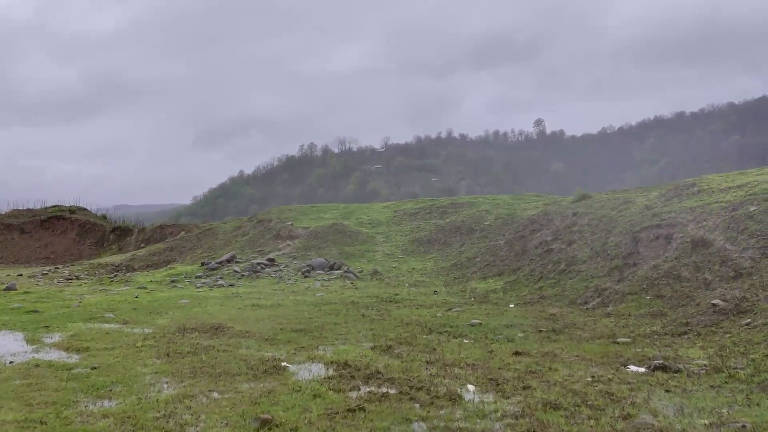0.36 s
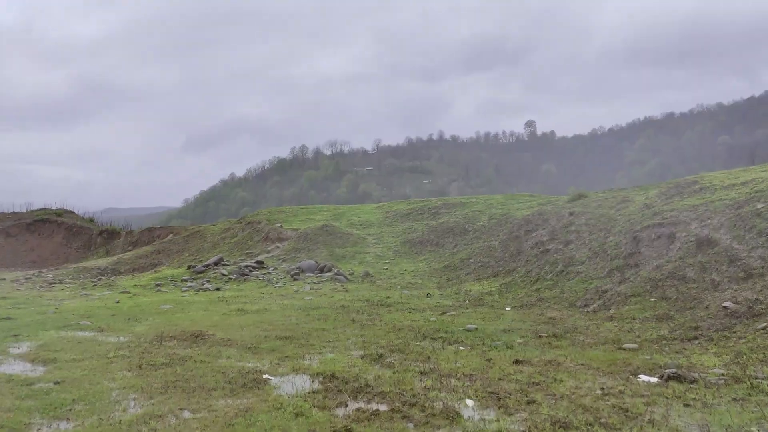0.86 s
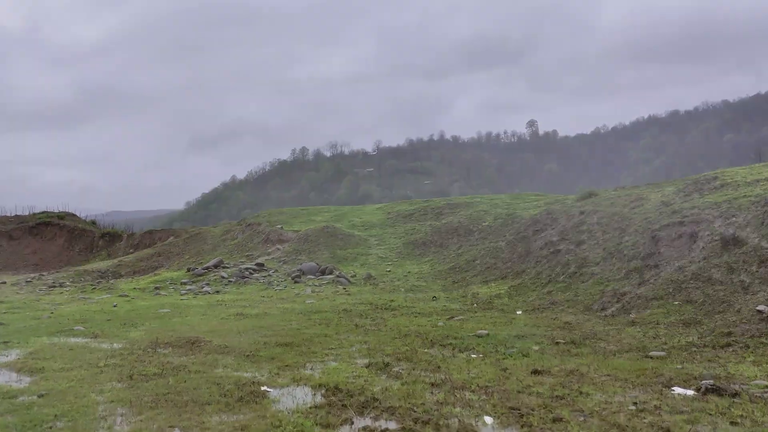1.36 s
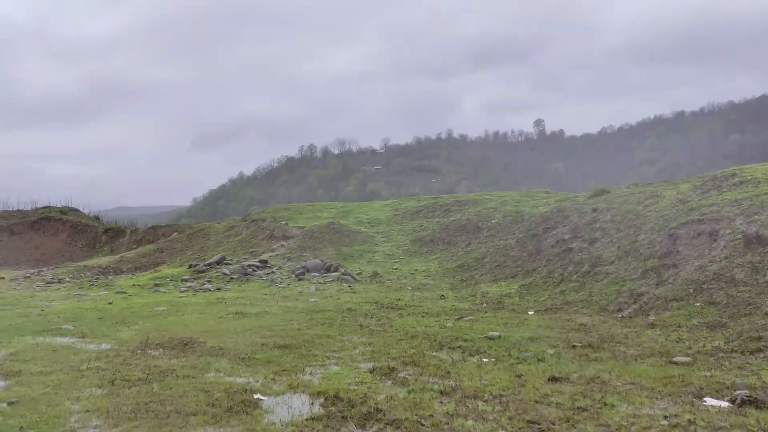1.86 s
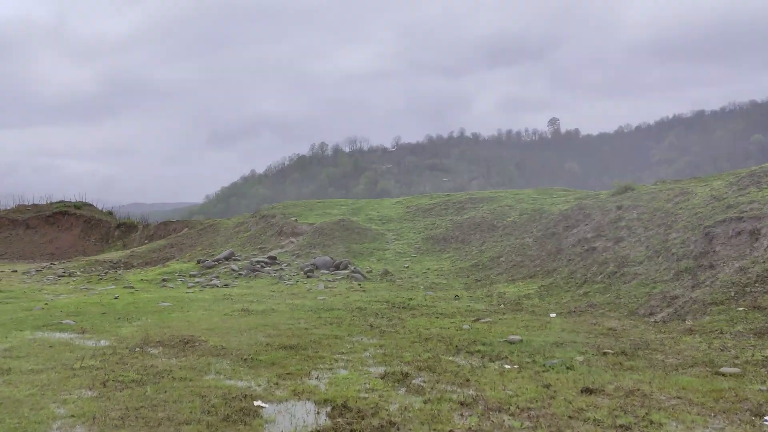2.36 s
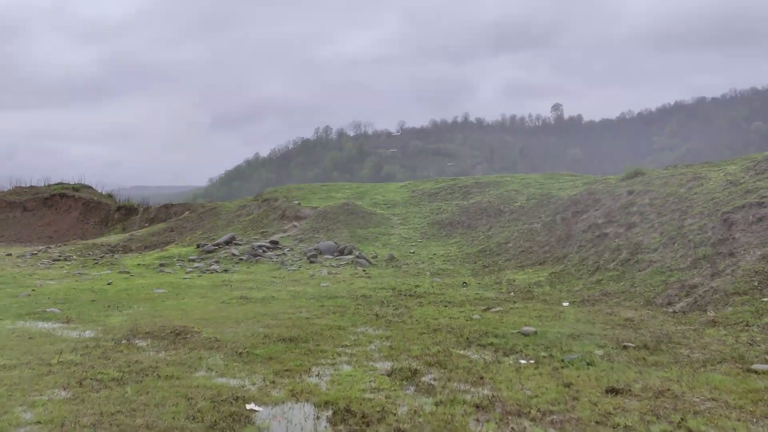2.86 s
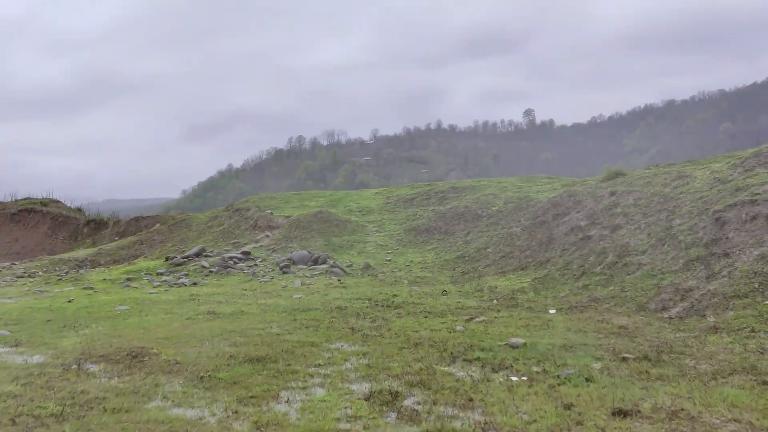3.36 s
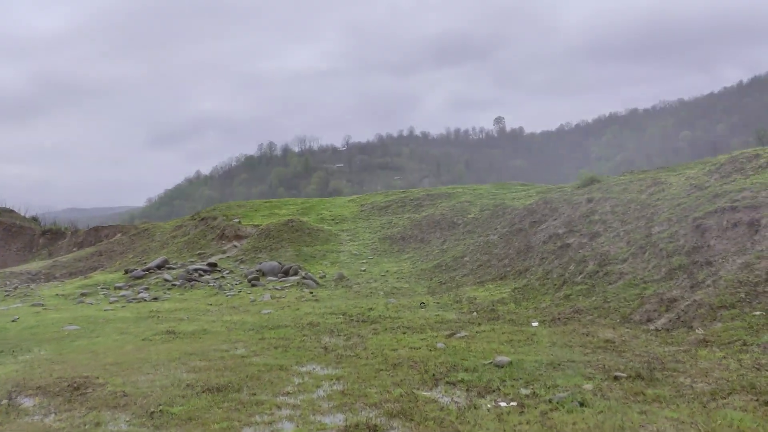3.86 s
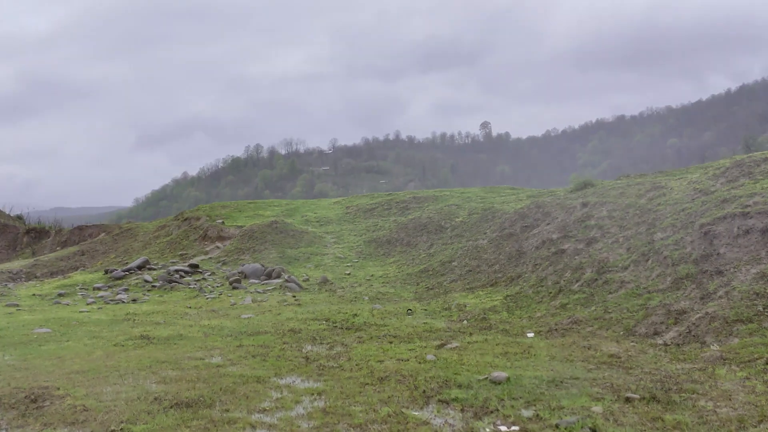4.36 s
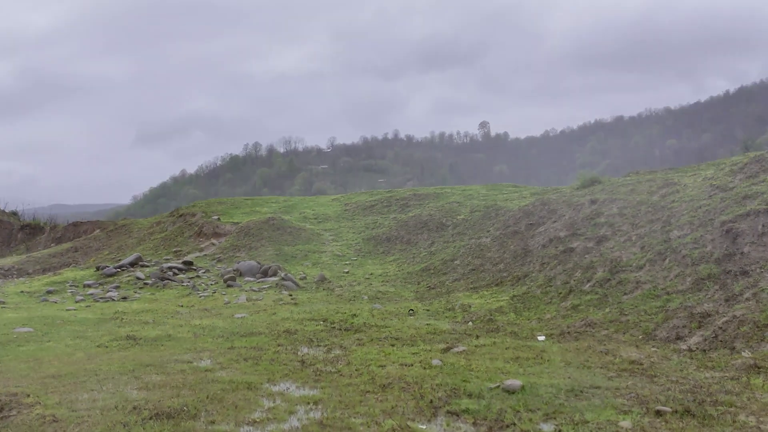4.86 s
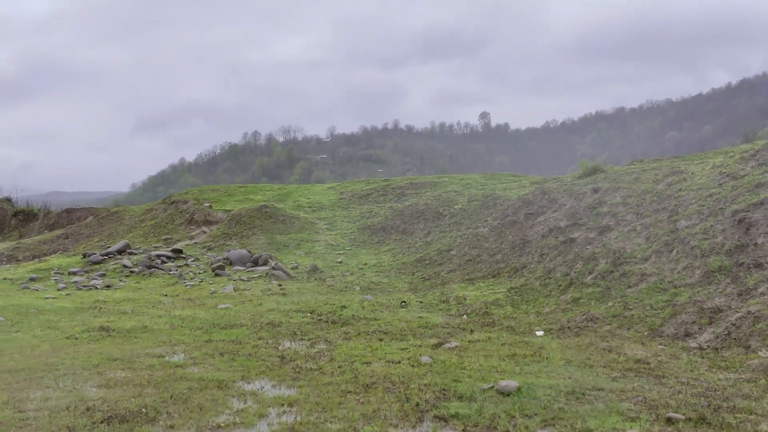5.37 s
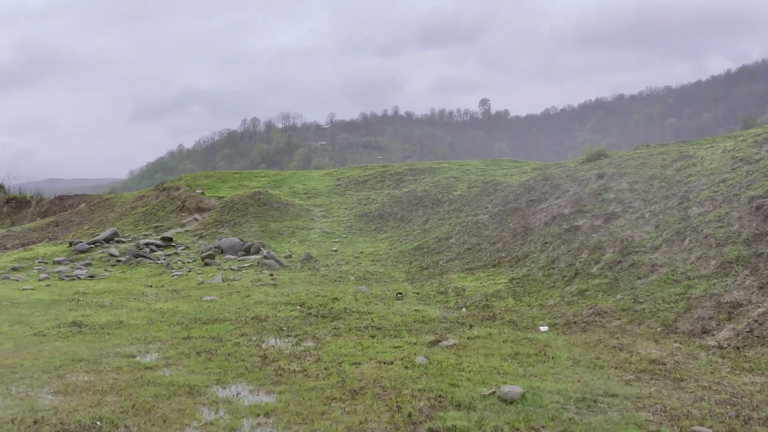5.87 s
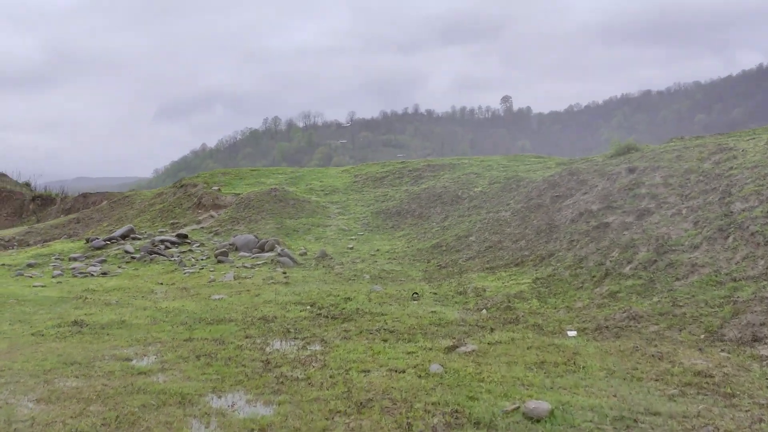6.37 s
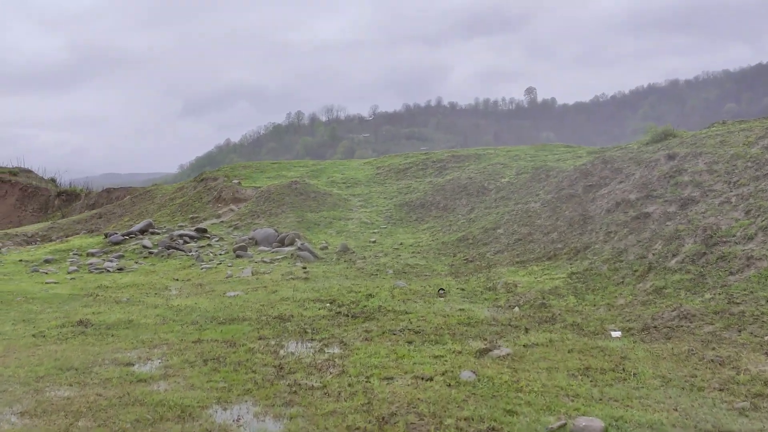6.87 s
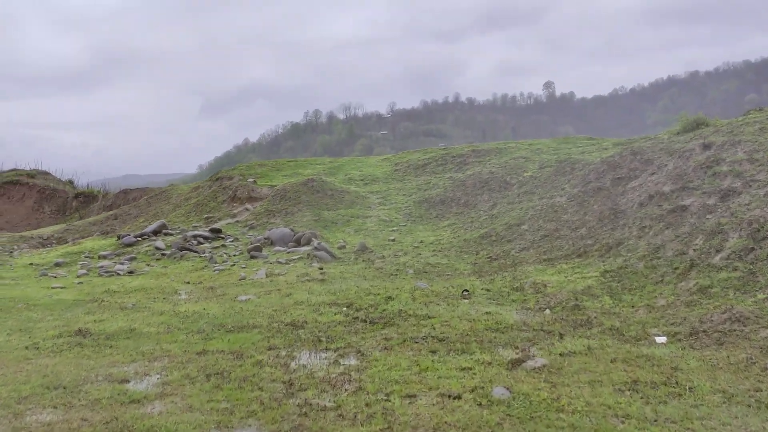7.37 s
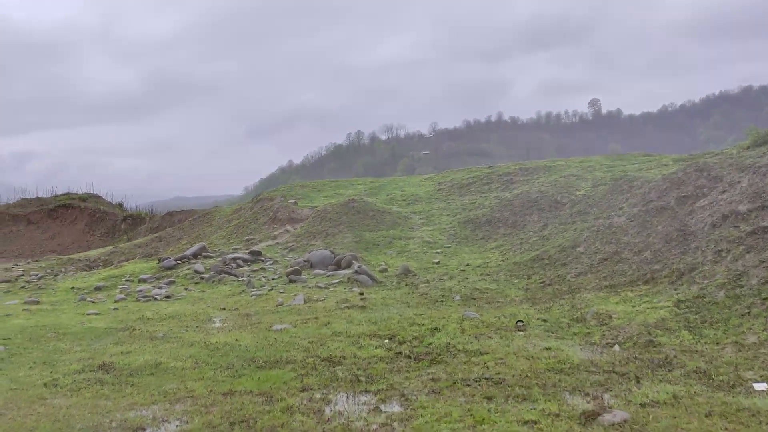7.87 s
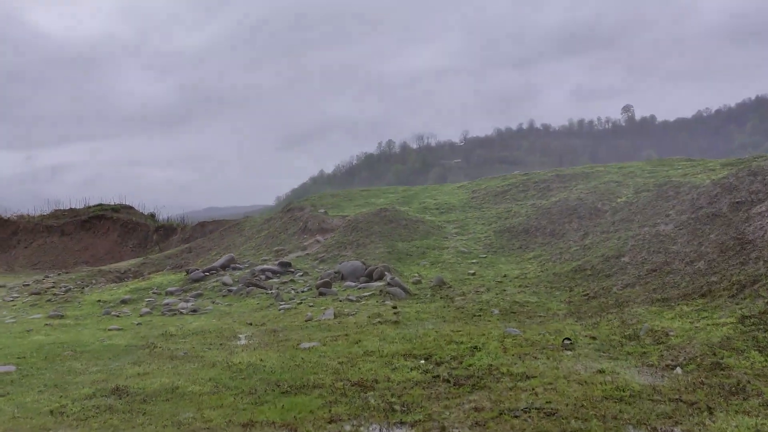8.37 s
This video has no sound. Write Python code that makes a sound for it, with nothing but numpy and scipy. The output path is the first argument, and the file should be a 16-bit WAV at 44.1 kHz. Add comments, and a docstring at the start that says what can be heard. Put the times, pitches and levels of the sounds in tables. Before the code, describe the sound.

In an open, wet field, a walker's steps crush grass with wet crackle and brittle snaps, the strongest near the start and the end. Low distant wind rumbles throughout, and gusts bump the left side of a handheld stereo microphone. A few faint bird whistles come early, two tiny squeaks underfoot midway. Dry, close and echo-free, with no speech.

```python
"""Wind is heard first: a nearly steady far roar reaching the right port before the left, and lumpy buffets mostly left.
Over it someone walks on wet grass: legs swish, blades crush and snap, mud pops, two short squeaks sound
and a small bird chirps a few times. The wind, crush and swish are shaped noise, with damped sines for the grains
of the crush; snaps are noise bursts through resonances, pops, squeaks and thumps decaying sines, chirps arched sines.
Two microphone ports hear it all; the left one is turned away and hears little treble."""
import sys
import numpy as np
from scipy import signal
from scipy.fft import rfft, irfft, next_fast_len
from scipy.io import wavfile
from scipy.ndimage import map_coordinates

SR = 44100
rng = np.random.default_rng(int(sys.argv[2]) if len(sys.argv) > 2 else 0)


def amplitude_ratio(level_db):
    """Convert a level in decibels to the matching linear amplitude (field) ratio."""
    exponent = np.asarray(level_db, float) / 20
    return 10 ** exponent


def digitize_waveform(pressure):
    """Quantize a signal to 16-bit integers and store it at the path in sys.argv[1].

    Rows of a 2-D input are taken as channels; values are limited to [-1, 1].
    """
    field = np.atleast_2d(pressure).T
    bounded = np.clip(field, -1, 1)
    quanta = np.round(bounded * 32767).astype(np.int16)
    wavfile.write(sys.argv[1], SR, quanta)


N = 373968  # samples

# spectrum shared by crushed and snapping blades: f/Hz, relative density level/dB
CRUSH_SPECTRUM = [(1200, -48), (2000, -9), (2900, -3.5), (4200, 0), (5500, 0.5), (8000, 5.5), (10000, -3.5),
                  (12000, -7), (15500, -6)]
# left-right likeness of sounds at the feet: f/Hz, share in common (0-1)
NEAR_LIKENESS = [(800, 0.96), (2000, 0.26), (4000, 0.1), (9000, 0.1)]
FAR_LAG, NEAR_LAG = 24 / SR, 7.5 / SR  # s by which the left port hears later


def unit(x):
    """Normalization: scale to rms 1."""
    return x / np.sqrt(np.mean(x ** 2) + 1e-20)


def along(points, hz):
    """Logarithmic frequency scale: (f/Hz, value) points are joined on a log axis."""
    f, value = np.transpose(points)
    return np.interp(np.log(hz + 1), np.log(f + 1), value)


def wobble(rate):
    """Band-limited fluctuation: a spline through random knots, rate (at most SR / 9) of them a second."""
    knots = rng.standard_normal(N // 8)
    return map_coordinates(knots, [np.arange(N) * min(rate, SR / 9) / SR], order=3)


def filtered(x, response):
    """Linear filtering: the spectrum is multiplied by a complex response of frequency."""
    m = next_fast_len(N + 8192)
    return irfft(rfft(x, m) * response(np.fft.rfftfreq(m, 1 / SR)), m)[..., :N]


def coloured(x, spectrum):
    """Spectral shaping: x passes a spectrum that is closed at both ends."""
    closed = [(spectrum[0][0] / 2, -120), *spectrum, (spectrum[-1][0] * 2, -120)]
    return filtered(x, lambda hz: amplitude_ratio(along(closed, hz)))


def ports(pair, alike, lag):
    """Partial coherence: left is a late blend of two signals, right the first alone."""
    def blend(hz):
        share = np.clip(along(alike, hz), 0, 1)
        delay = np.exp(-2j * np.pi * hz * lag)
        return np.array([share, np.sqrt(1 - share ** 2)]) * delay
    return np.array([filtered(pair, blend).sum(axis=0), pair[0]])


def sides(left_db):
    """Level difference between ports: gains that split a left-over-right value evenly."""
    return amplitude_ratio(np.array([left_db / 2, -left_db / 2]))


def strokes(start, hold, db, rise, fall, rest_db):
    """Energy addition: strokes with linear slopes in dB/s sum in power over a resting level, giving dB."""
    t = np.arange(0, N / SR + .01, .001)
    early = np.maximum(start[:, None] - t, 0)
    late = np.maximum(t - (start + hold)[:, None], 0)
    each = db[:, None] - rise * early - fall * late
    power = (amplitude_ratio(each) ** 2).sum(axis=0) + amplitude_ratio(rest_db) ** 2
    return np.interp(np.arange(N) / SR, t, 10 * np.log10(power))


def grains(count, mid_hz, spread, cycles, size_db):
    """Granular noise: two showers of damped sines share their times, each grain with its own pitch and size."""
    when, pitch, size, sign = rng.random((4, 2, count))
    hz = np.clip(mid_hz * np.exp(spread * 3.72 * (pitch - .5)), 400, SR / 3)[..., None]
    n = np.arange(128)
    shape = np.sin(2 * np.pi * hz * n / SR) * np.exp(-n * hz / SR / cycles)
    strength = np.sign(sign - .5) * amplitude_ratio(-size_db * np.log(size + 0.0068))
    shape *= strength[..., None] * np.sqrt(hz)  # short high grains keep their energy
    at = (when[0] * N).astype(int)[:, None] + n
    return np.array([np.bincount(at.ravel(), g.ravel(), N + 128)[:N] for g in shape])


def roar():
    """Distant turbulence: far wind over the slopes is a nearly steady noise, partly coherent at the ports."""
    # roar spectrum: f/Hz, relative density level/dB
    far_spectrum = [(40, -39), (69, -17.5), (185, -7.5), (330, -7), (400, -8.5), (615, -18.5), (800, -22),
                    (1200, -27), (1700, -29), (2000, -35.5), (2700, -36.5), (4200, -38.5), (8500, -47),
                    (11000, -63), (15800, -62)]
    # left-right likeness: f/Hz, share in common (0-1)
    far_likeness = [(100, 0.92), (300, 1), (500, 0.13), (1000, 0.54), (2000, 0.62), (4000, 0.07),
                    (10000, .05)]
    noise = unit(coloured(rng.standard_normal((2, N)), far_spectrum))
    return amplitude_ratio(-41 + 1.2 * wobble(11)) * ports(noise, far_likeness, FAR_LAG)


def buffet():
    """Local turbulence: eddies shake each port on their own, so the lumpy low noises are incoherent."""
    # gusts: t/s, level before surges and port difference/dB
    gusts = [(0.0, -39), (0.15, -40.5), (0.3, -42), (0.6, -39), (0.95, -41), (1.05, -54), (1.4, -43),
             (1.7, -48), (2.1, -41.5), (2.45, -41), (2.7, -42.5), (3.1, -42.5), (3.5, -40), (3.75, -41.5),
             (4.0, -41), (4.3, -41), (4.75, -48), (5.4, -52), (6.0, -54), (6.45, -49), (7.1, -60),
             (7.4, -46), (7.65, -41.5), (7.95, -48.5), (8.15, -42), (8.48, -51.5)]
    # buffet spectrum: f/Hz, relative density level/dB
    buffet_spectrum = [(20, -72), (40, -24), (70, -8), (120, -1), (200, -4), (300, -11), (450, -22),
                       (800, -30), (1500, -98)]
    gust_s, gust_db = np.transpose(gusts)
    level_db = np.interp(np.arange(N) / SR, gust_s, gust_db)
    slow = np.array([wobble(25), wobble(29)])
    fast = np.array([wobble(90), wobble(90)])
    lumps = amplitude_ratio(2.24 * slow + 2.24 * fast)
    surges = amplitude_ratio(level_db + wobble(4.28))  # quick random surges of 1 dB
    noise = unit(coloured(lumps * rng.standard_normal((2, N)), buffet_spectrum))
    return surges * sides(14.5)[:, None] * noise


def swish():
    """Friction noise: legs brush as they swing, smooth and bright, stronger at the right port."""
    # swings: start t/s, hold/s, level before port difference/dB
    swings = [(0.618, 0.019, -51.5), (1.35, 0.4, -70), (1.796, 0.24, -59.5), (2.787, 0.21, -63.5),
              (3.12, 0.18, -65.5), (3.864, 0.085, -66.5), (4.3, 0.4, -72.5), (5.09, 0.05, -59),
              (5.45, 0.4, -69.5), (5.66, .06, -66), (6.13, 0.15, -66.5), (6.758, 0.11, -65.5),
              (7.25, 0.13, -60), (7.5, 0.086, -65.5), (7.76, .08, -65), (7.934, 0.081, -62),
              (8.41, .08, -64)]
    # brushing spectrum: f/Hz, relative density level/dB
    brush_spectrum = [(2500, -2), (4500, -0.5), (6500, 2), (8000, 6), (10000, -2.5), (12000, -1),
                      (15500, 0)]
    rise, fall = 100, 110  # dB/s
    cloth_db = -73.5  # faint steady brushing
    level_db = strokes(*np.transpose(swings), rise, fall, cloth_db)
    noise = unit(coloured(rng.standard_normal((2, N)), brush_spectrum))
    return amplitude_ratio(level_db + 1.5 * wobble(25)) * sides(-11.5)[:, None] * noise


def tread():
    """Superposed impacts: the sole crushes blades into crackle over a hiss and presses out lower wet grains."""
    # sole presses: start t/s, hold/s, nominal crush level/dB, squelch over crush/dB, dry top over crush/dB
    presses = [(0.246, 0.027, -49.5, -5, -1), (0.306, 0.013, -41, -7.5, 1), (0.314, 0.025, -56, -14, -5),
               (0.707, 0.011, -54.5, -2, 1), (0.753, 0.014, -50, -4, -9), (0.82, 0.057, -54.5, 3, -1.5),
               (1.294, 0.16, -60.5, 0.5, 1), (1.954, 0.032, -49, -0.5, 3), (2.417, 0.027, -59.5, -16, 11),
               (2.48, 0.055, -47.5, -2, -4), (2.921, 0.015, -46, -10, 5), (3.013, 0.011, -53, -10, 1),
               (3.048, 0.038, -48, -2.5, -3), (3.433, 0.022, -62.5, -11, 10), (3.457, 0.023, -51, -12, 0.5),
               (3.536, 0.097, -53.5, -3.5, -11), (4.096, 0.037, -46.5, -10, 2),
               (4.174, 0.06, -57.5, 0, 0.5), (4.623, 0.065, -49, -14, -7), (4.7, 0.026, -48.5, -7.5, 0),
               (5.205, 0.038, -49, -4, 2), (5.254, 0.023, -47, -10, -3), (5.32, 0.051, -62, -16, -17),
               (5.723, 0.008, -53, -14, -3), (5.741, 0.016, -41.5, -10, 1.5), (6.154, 0.033, -55, 4.5, 2),
               (6.203, 0.11, -56, -6, -10), (6.322, 0.08, -49, 1, 1.5), (6.806, 0.028, -60.5, -23, 7.5),
               (6.863, 0.058, -42.5, -7, -3), (6.945, 0.023, -50, -9, -4), (7.023, .035, -59, -16, -6),
               (7.385, 0.0065, -46.5, -1.5, 5), (7.455, 0.15, -56.5, -1.5, -5), (8.044, 0.05, -53, -19, -7),
               (8.136, 0.023, -69.5, 19.5, -19)]
    # squelch spectrum: f/Hz, relative density level/dB
    squelch_spectrum = [(400, -25), (800, -2), (1300, 0.5), (1700, 4), (2600, -3), (4000, 5.5)]
    slopes = 1800, 450, -67  # rise dB/s, fall dB/s, nominal resting dB: the grass never quite rests
    dry_hz = 5800  # dry blade tips sound above this, wet stems below
    start, hold, db, wet_db, top_db = np.transpose(presses)
    crush_db = strokes(start, hold, db, *slopes)
    squelch_db = strokes(start, hold, db + wet_db, *slopes)
    tips_db = strokes(start, hold, db + top_db, *slopes)

    # harder presses crackle more and clump more
    effort = np.clip((crush_db + 71.0) / 9, 0, 1)
    crackle = unit(grains(count=15000, mid_hz=5000, spread=0.5, cycles=4, size_db=3.6))
    hiss = rng.standard_normal((2, N))
    clumps = amplitude_ratio(effort * 2.2 * wobble(220) + effort * 1.5 * wobble(45))
    crush = unit(coloured(clumps * (0.58 * effort * crackle + 0.73 * hiss), CRUSH_SPECTRUM))

    drops = unit(grains(count=7000, mid_hz=1400, spread=0.37, cycles=4.5, size_db=1.8))
    squelch = unit(coloured(drops + 0.77 * hiss[::-1], squelch_spectrum))

    stems = filtered(crush, lambda hz: 1 / (1 + (hz / dry_hz) ** 6))
    tips = crush - stems
    near = amplitude_ratio(crush_db + 2.5) * stems + amplitude_ratio(tips_db + 0.5) * tips + amplitude_ratio(squelch_db + 2.5) * squelch
    return sides(0.93)[:, None] * ports(near, NEAR_LIKENESS, NEAR_LAG)


def snaps():
    """Resonant fracture: a fast-dying burst of grit, sharper when harder, excites the pitch of its blade."""
    # snapping blades: t/s, nominal level/dB, left over right before port blending/dB, resonance f/Hz,
    # relative top fizz/dB
    snap_events = [(0.225, -28.5, 2, 8070, -10), (0.234, -40, -5, 9000, -10), (0.255, -23, 4, 7660, -5),
                   (0.305, -15, 3, 5400, -17), (0.312, -23.5, -1, 8550, -5), (0.339, -22, 0, 4470, -21),
                   (0.404, -33, 1, 8900, -14), (0.723, -27, -4, 7500, -9), (0.729, -20, 9, 4280, -32),
                   (0.753, -21, 9, 2900, -30), (0.758, -24, 5, 4630, -30), (0.763, -25.5, 3, 8000, -20),
                   (0.859, -31, 0, 4270, -12), (0.882, -34, 0, 3500, -25), (1.3009, -37, 1, 3950, -4),
                   (1.714, -31.5, -13, 2550, -38), (1.966, -21, -8, 5200, -17),
                   (2.373, -35.5, -9, 3740, -6), (2.4233, -30, -1, 6560, -3), (2.466, -24, 1, 4970, -27),
                   (2.483, -22, -5, 4530, -14), (2.537, -25, -9, 6000, -22), (2.9286, -27, -3, 7800, -6),
                   (2.9377, -25, -1, 8140, -11), (2.9817, -25.5, 0, 2700, -18), (3.026, -22, -9, 8650, -18),
                   (3.052, -21, 4, 6210, -6), (3.068, -34, -5, 6500, -20), (3.081, -21.5, -3, 8500, -19),
                   (3.467, -28.5, -5, 4500, -9), (3.543, -34, -8.5, 8200, -8),
                   (3.559, -30.5, -6, 6700, -20), (3.6187, -34, 8, 3500, -33), (3.63, -33, -1, 7600, -16),
                   (4.038, -30.5, -5, 8050, -14), (4.0836, -32, -8.5, 6700, -2),
                   (4.1215, -27, -2, 7950, -10), (4.19, -31.5, -16, 6100, -36),
                   (4.5915, -29, -8, 3440, -13), (4.6309, -22.5, 7, 3330, -32), (4.644, -26, -5, 4070, -17),
                   (4.652, -25, -5, 4100, -32), (4.659, -27.5, -4, 8600, -7), (4.669, -27, -5, 3900, -34),
                   (4.714, -31, -5, 4500, -30), (4.7247, -27, -9, 8600, -16), (4.9521, -38, -18, 5420, -20),
                   (5.146, -26, -1, 3870, -14), (5.2026, -31.5, -6.5, 8360, -19),
                   (5.218, -30, -4, 3500, -10), (5.224, -31, -6, 6300, -25), (5.257, -31, -3, 3200, -30),
                   (5.265, -31, -5, 6600, -25), (5.288, -27, 3, 6850, -19), (5.5727, -26.5, -2, 2770, -38),
                   (5.7267, -20.5, -3, 4400, -29), (5.7383, -17, 5, 6430, -29), (5.752, -23, -2, 8000, -25),
                   (5.759, -27, -4, 8000, -25), (6.158, -26.5, 6, 5220, -10), (6.175, -23.5, 0, 4160, -25),
                   (6.2896, -26.5, 0, 6270, -10), (6.319, -32, -3, 4290, 3), (6.3844, -35, -4.0, 2500, -27),
                   (6.413, -31.5, -13, 7850, -26), (6.422, -32, -10, 7800, -26),
                   (6.8049, -30.5, 1, 8320, -5), (6.864, -25.5, 1, 3500, -4), (6.901, -20, -8, 3100, -24),
                   (6.927, -36, 0, 5000, -15), (6.951, -34, -5, 5500, -15), (7.0239, -30, 3, 7840, -23),
                   (7.0509, -27.5, 15, 8230, -25), (7.367, -40, -3, 8200, -25), (7.383, -25, 5, 8600, -7),
                   (7.393, -20.5, 6, 7500, -25), (7.395, -17, 12, 2780, -28), (7.4593, -23.5, 8, 2570, -18),
                   (7.6036, -30.5, 0, 4900, -9), (8.0492, -25.5, 1, 6980, -7),
                   (8.061, -18.5, -3, 3830, -24), (8.1396, -13, -5, 4580, -16.5),
                   (8.189, -26.5, -3, 4450, -34)]
    rise_s, soft_db = .0015, -28  # rise of a snap of this nominal level; louder ones rise faster
    out = np.zeros((2, 2, N + SR))  # port, kindred signal, time
    t = np.arange(SR // 8) / SR
    f = np.fft.rfftfreq(len(t), 1 / SR)
    for s, db, left_db, hz, fizz_db in snap_events:
        rise = rise_s * amplitude_ratio(np.clip(soft_db - db, -16, 4))
        grit = rng.standard_normal((2, len(t))) * amplitude_ratio(1.2 * rng.standard_normal(len(t)))
        decay = 1.18 * amplitude_ratio(-60 * t / .016) + 0.5 * amplitude_ratio(-60 * t / 0.055)  # tick and tail, each with its t60/s
        burst = grit * amplitude_ratio(db - 9.0) * decay * (1 - np.exp(-t / rise)) ** 2
        fizz = 0.45 * amplitude_ratio((fizz_db + 21.5) * np.clip(f / 5000 - 1.4, 0, 1))
        resonance = 1.5j * f * 0.16 * hz / (hz ** 2 - f ** 2 + 1j * f * 0.17 * hz)
        snap = irfft(rfft(burst) * (fizz + resonance), len(t))
        out[:, :, round(s * SR):][..., :len(t)] += sides(left_db)[:, None, None] * snap
    left, right = (ports(coloured(pair[:, :N], CRUSH_SPECTRUM), NEAR_LIKENESS, NEAR_LAG) for pair in out)
    return np.array([left[0], right[1]])


def thumps():
    """Membrane displacement: one strong eddy pushes it in and out for a cycle or two."""
    # single eddies: t/s, nominal level/dB, left over right/dB
    eddies = [(0.236, -17.5, 18), (0.29, -20.5, 18), (0.367, -21, 20), (0.411, -24, 14), (0.588, -21.5, 19),
              (1.612, -32, 6), (3.831, -23, 24), (3.944, -26, 24), (4.041, -33, 11), (6.367, -20.5, 13),
              (7.653, -22.5, 27), (7.773, -20.5, 14)]
    out, t = np.zeros((2, N + SR)), np.arange(SR // 16) / SR
    for s, db, left_db in eddies:
        hz = 150 * amplitude_ratio(rng.normal(0, 2.3))
        push = np.sin(2 * np.pi * hz * t) * t / 0.0064 * np.exp(1 - t / 0.0035)
        out[:, round(s * SR):][:, :len(t)] += amplitude_ratio(db - 4.0) * sides(left_db)[:, None] * push
    return filtered(out[:, :N], lambda hz: 1 / (1 + (70 / (hz + 1)) ** 4))  # low cut at 70 Hz


def pops_and_squeaks():
    """Damped oscillation: mud pops and short squeaks ring with rising pitch; those under 3 kHz have undertones."""
    # low rows are mud pops, the two above 4 kHz short squeaks: t/s, nominal level/dB, starting f/Hz, t60/s
    rings = [(0.31, -16.5, 1490, 0.0063), (0.305, -12.5, 1070, 0.0058), (0.753, -33, 1500, 0.01),
             (0.82, -29, 2300, 0.014), (0.858, -35, 1600, 0.01), (0.825, -24.5, 1330, 0.0091),
             (1.966, -37, 1225, 0.033), (2.467, -32, 1610, 0.012), (2.484, -30.5, 1100, 0.015),
             (3.053, -32, 1250, 0.021), (3.628, -36, 1710, 0.022), (3.637, -41, 1760, 0.02),
             (3.65, -42, 1650, 0.03), (4.6588, -29.5, 4250, 0.03), (4.6775, -35, 4520, 0.022),
             (5.218, -35.5, 1380, 0.033), (5.738, -35.5, 1680, 0.022), (6.162, -42, 1690, 0.025),
             (6.193, -36, 1600, 0.014), (6.319, -29, 1230, 0.016), (6.343, -34, 1490, 0.018),
             (6.367, -30.5, 1380, 0.022), (6.9, -30, 1430, 0.016), (6.927, -33, 1500, 0.011),
             (7.106, -35, 1170, 0.029), (7.3833, -31, 2220, 0.011), (7.39, -30, 755, 0.015),
             (8.064, -34, 1050, 0.015), (8.14, -8.5, 1580, 0.011)]
    out, t = np.zeros(N + SR), np.arange(SR // 16) / SR
    for s, db, hz, t60 in rings:
        phase = 2 * np.pi * hz * t * (1 + 1.4 * t)
        undertones = 0.36 * np.sin(0.586 * phase) + 0.42 * np.sin(0.22 * phase)
        ring = np.sin(phase) + (hz < 3000) * undertones
        rise = 0.0013 * amplitude_ratio(np.clip(-17 - db, -9, 0))  # s, shorter for loud rings
        envelope = amplitude_ratio(db + 2.5 - 60 * t / max(t60, .003)) * (1 - np.exp(-t / rise))
        out[round(s * SR):][:len(t)] += envelope * ring
    pair = np.array([out[:N], 0 * out[:N]])
    return amplitude_ratio([[-1.2], [1.2]]) * ports(pair, [(1000, 1)], NEAR_LAG)  # fully coherent


def bird():
    """Frequency modulation: short thin whistles arch in pitch, waver a little and fade."""
    # chirps: t/s, length/s, f near the top of the arch/Hz, level before port gains/dB
    chirps = [(1.312, .045, 4170, -60), (1.577, 0.073, 4230, -54.5), (1.848, 0.05, 4200, -61),
              (2.135, 0.061, 4200, -58), (2.424, 0.021, 4100, -57)]
    out = np.zeros(N + SR)
    for s, length, hz, db in chirps:
        u = np.linspace(0, 1, round(length * SR))
        pitch = hz * (1 - 0.09 * (u - .42) ** 2 + 0.004 * wobble(98)[:len(u)])
        envelope = amplitude_ratio(db) * np.sin(np.pi * u ** 0.65) ** 0.9
        out[round(s * SR):][:len(u)] += envelope * np.sin(2 * np.pi * np.cumsum(pitch) / SR)
    pair = np.array([out[:N], 0 * out[:N]])
    return amplitude_ratio([[-3.5], [2.5]]) * ports(pair, [(1000, 1)], FAR_LAG)  # fully coherent


def scene():
    """Linear superposition: all sources add at the two ports."""
    return roar() + buffet() + swish() + tread() + snaps() + thumps() + pops_and_squeaks() + bird()


def roll_off(x):
    """The treble ends steeply here."""
    return signal.sosfilt(signal.butter(12, 16460, fs=SR, output="sos"), x)


def record(dry):
    """Shading and band limiting: the left port loses treble and nothing passes above the limit."""
    # treble shading of the left port: f/Hz, gain/dB
    shade = [(1000, -0.5), (3000, -1.5), (5500, -7), (7500, -22), (9500, -64), (12000, -1.5), (15000, -18)]
    top_hz = 15830
    heard = filtered(dry, lambda hz: (hz < top_hz) * amplitude_ratio([along(shade, hz), 0 * hz]))
    return roll_off(heard)


dry = scene()
out = record(dry)
digitize_waveform(out)
```